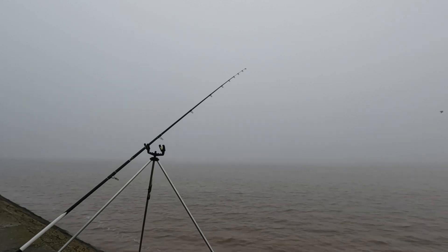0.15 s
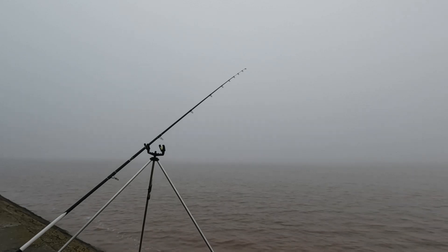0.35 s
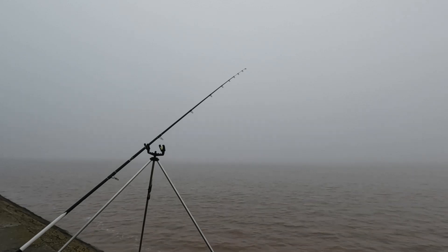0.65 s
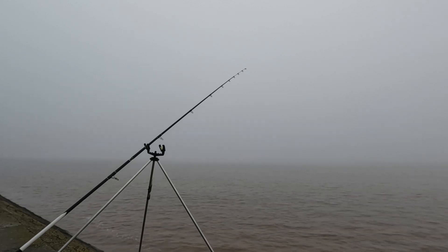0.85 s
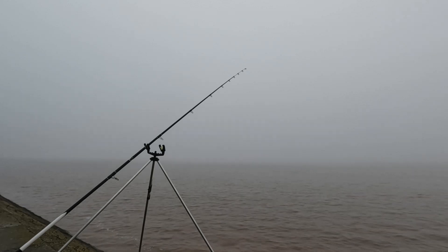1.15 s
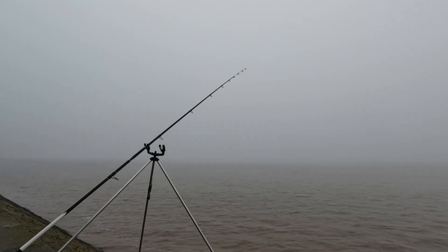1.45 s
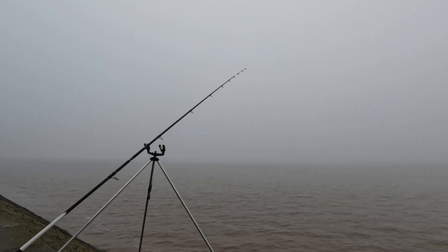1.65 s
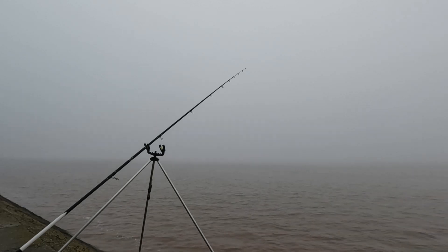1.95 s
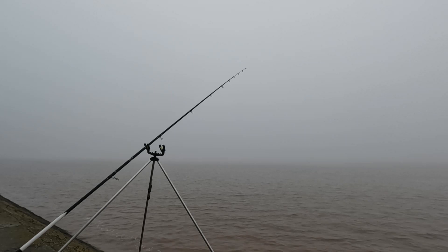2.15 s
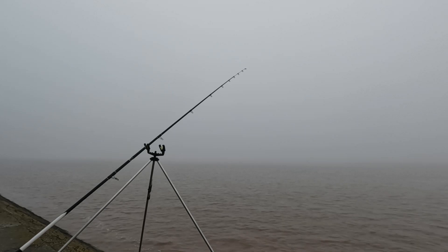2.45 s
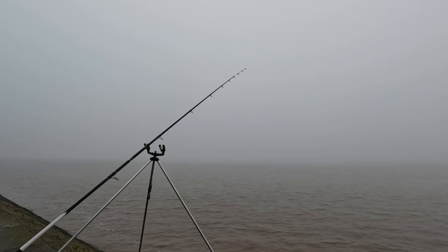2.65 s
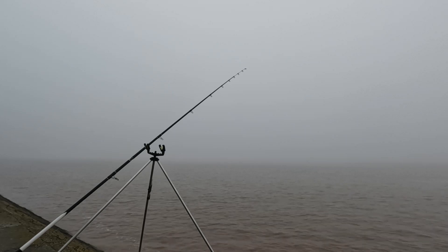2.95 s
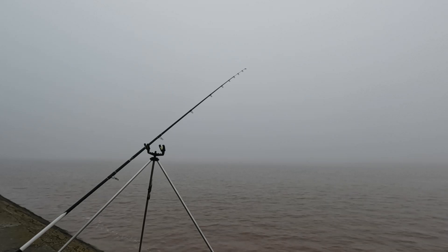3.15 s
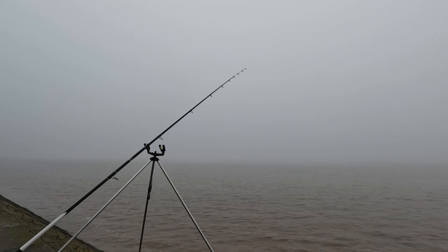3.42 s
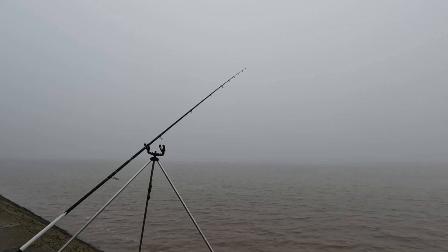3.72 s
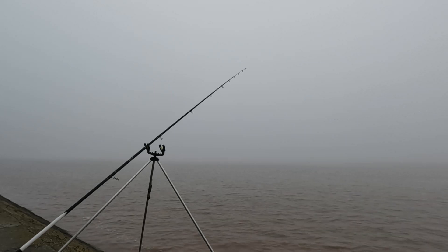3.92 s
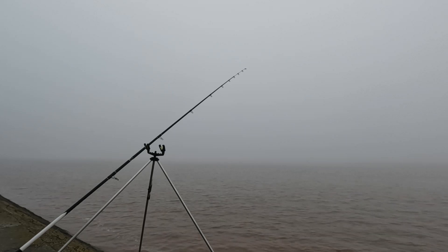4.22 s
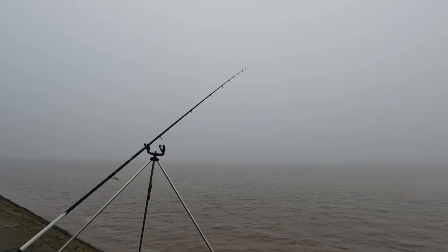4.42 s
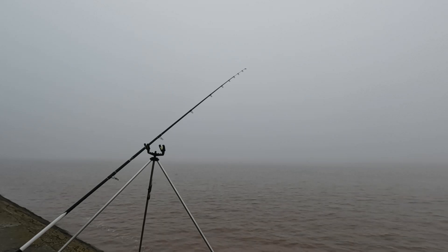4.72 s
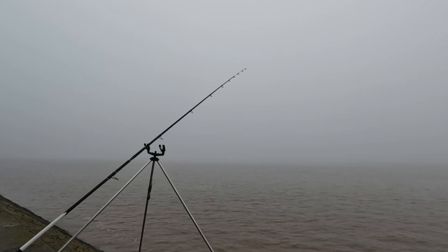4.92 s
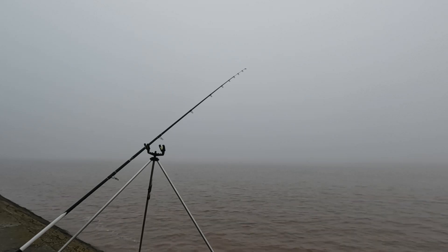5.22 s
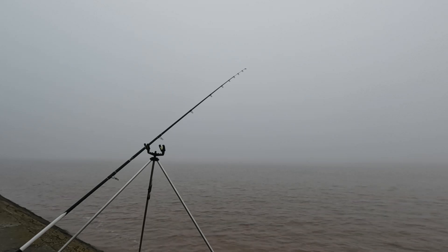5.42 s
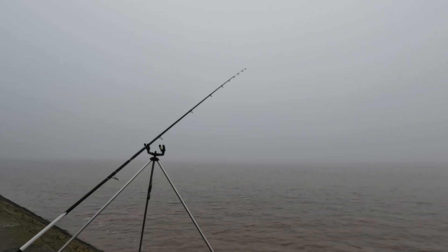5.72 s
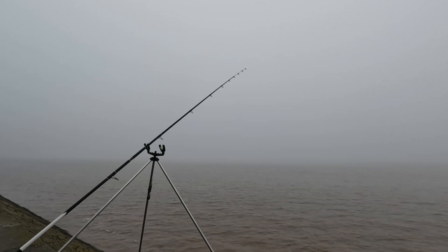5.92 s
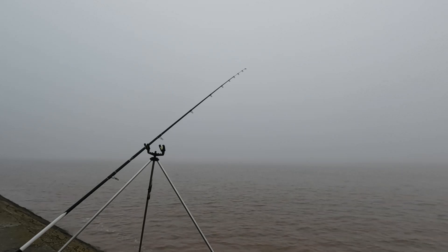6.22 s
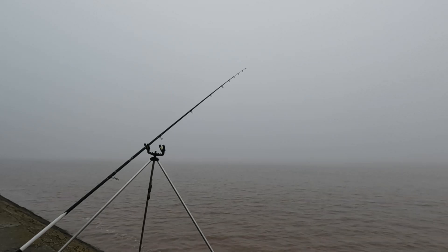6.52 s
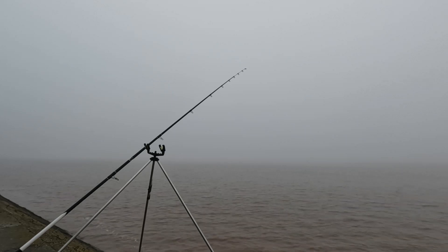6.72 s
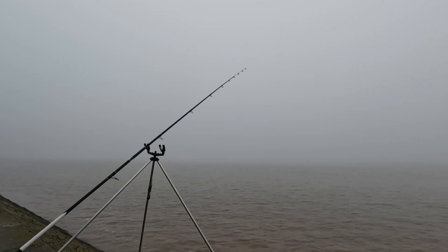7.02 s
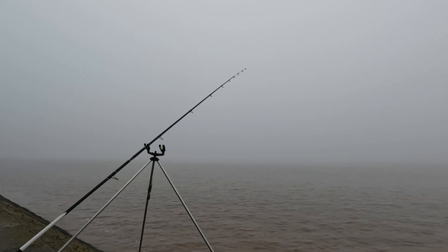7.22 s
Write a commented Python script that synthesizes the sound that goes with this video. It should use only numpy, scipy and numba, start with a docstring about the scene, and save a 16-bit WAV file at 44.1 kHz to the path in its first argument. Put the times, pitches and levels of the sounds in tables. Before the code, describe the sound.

A low wind rumbles steadily while river water washes gently on stone, with light slaps, ticking drops and little bubbling glugs.

```python
"""River lapping a stone bank

A wide muddy river laps a sloping stone bank on a foggy day, close below the listener.
Wind and far-off rumble fill the bass, and a faint narrow hum hangs over the water.
Wavelets wash up as a fizz of countless bubbles, and drops slap and tick on the stones.
Small bubbles pop as short tones; pockets of air glug, gliding in pitch as they surface."""
import sys
import numpy as np
from scipy import signal
from scipy.fft import rfft, irfft, next_fast_len
from scipy.io import wavfile
from scipy.ndimage import uniform_filter1d
from numba import njit

SR = 44100
rng = np.random.default_rng(int(sys.argv[2]) if len(sys.argv) > 2 else 0)


def unload_wav(signal):
    """Save mono or channel-first audio to the path in sys.argv[1] as 16-bit WAV at rate SR, clipped to [-1, 1]."""
    wavfile.write(
        sys.argv[1],
        SR,
        np.round(np.clip(np.atleast_2d(signal).T, -1, 1) * 32767).astype(np.int16),
    )


N = 324576
BIN_HZ = np.maximum(np.arange(N // 2 + 1) * SR / N, 1)


def undb(db):
    """Decibels to gain."""
    return 10 ** (np.asarray(db) / 20)


def unit(x):
    """Scale to rms 1."""
    return x / np.sqrt(np.mean(x ** 2))


def curves(table):
    """Automation lanes: each column ramps straight between its time points."""
    s, *columns = np.transpose(table)
    return [np.interp(np.arange(N) / SR, s, c) for c in columns]


def at(table, hz):
    """Value of a (Hz, value) table on a log-frequency axis."""
    f, v = np.transpose(table)
    return np.interp(np.log(hz), np.log(f), v)


def walk(rate_hz):
    """Random modulator: sample-and-hold, smoothed twice, with a spread near 1."""
    hold = int(SR / rate_hz)
    steps = np.repeat(rng.standard_normal(N // hold + 1), hold)
    return 1.3 * uniform_filter1d(uniform_filter1d(steps, hold), hold)[:N]


def noise(gain, alike):
    """Mid/side noise with a gain per frequency; alike runs from 0 (wide) to 1 (mono)."""
    mid, side = rfft(rng.standard_normal((2, N))) * gain
    alike = np.clip(alike, 0, 1)
    mid, side = mid * np.sqrt((1 + alike) / 2), side * np.sqrt((1 - alike) / 2)
    return irfft(np.array([mid + side, mid - side]), N)


def bands(spectrum, alike, centres_hz):
    """Coloured noise in overlapping bands that together have rms 1."""
    gain = unit(undb(at(spectrum, BIN_HZ)))
    shares = [np.interp(np.log(BIN_HZ), np.log(centres_hz), row) for row in np.eye(len(centres_hz))]
    return [noise(gain * np.sqrt(share), at(alike, BIN_HZ)) for share in shares]


# Wind swells: (time [s], deep bass level [dB], upper bass level [dB])
WIND_SWELLS = [(0, -28, -36.5), (0.7, -26.5, -36.5), (.9, -24.5, -40.5), (1.1, -22.5, -36),
               (1.29, -24.5, -31), (1.37, -28, -41), (2.2, -27, -38), (2.55, -24, -36), (2.75, -28.5, -39),
               (3.4, -27, -37.5), (3.8, -28, -38), (4.3, -26, -33.5), (5.0, -27, -38.5), (5.7, -28, -40.5),
               (6.4, -28, -38), (6.9, -26.5, -40), (7.36, -25.5, -37.5)]
# Rumble EQ: (frequency [Hz], relative level [dB])
RUMBLE_EQ = [(5, -28.5), (12, -2), (22, 1.5), (33, -1.5), (54, -2), (70, -9.5), (105, -10), (157, -11.5),
             (254, -25), (340, -34), (450, -65), (700, -120)]
# Rumble stereo image: (frequency [Hz], left-right correlation [0-1])
RUMBLE_IMAGE = [(20, 0.78), (60, 0.88), (100, 0.5), (130, 0.39), (200, 0.82), (300, 0.57)]
def wind():
    """Turbulent rumble whose deep and upper bass swell separately."""
    deep_db, upper_db = curves(WIND_SWELLS)
    deep, upper = bands(RUMBLE_EQ, RUMBLE_IMAGE, [70, 115])
    return undb(deep_db) * unit(deep) + undb(upper_db) * unit(upper)


# Hum resonances: (centre [Hz], width [Hz], level [dB])
HUM_BANDS = [(148.5, 15, -50), (444.2, 20, -61), (2044, 29, -69.5)]
def hum():
    """Faint narrow bands of noise that waver, perhaps a distant engine."""
    out = 0
    for hz, width, db in HUM_BANDS:
        resonance = 1 / (1 + (2 * (BIN_HZ - hz) / width) ** 2)
        out += undb(db + .67 * walk(2.2)) * unit(noise(resonance, alike=.97))
    return out


# Wavelets on the stones: (crest time [s], length [s], wash crest [dB], spray crest [dB])
WAVELET_CRESTS = [(0.17, .3, -45, -62), (0.3, .3, -51, -59), (0.51, .15, -42, -55), (0.662, .35, -45, -56),
                  (1.06, .5, -43, -51), (1.317, .2, -46.5, -59.5), (1.501, .4, -53, -58.5),
                  (1.811, .15, -50, -62.5), (1.959, .2, -48, -63), (2.079, .2, -54, -59.5),
                  (2.175, .15, -50, -60), (2.297, .14, -45, -55), (2.428, .2, -50, -58.5),
                  (2.584, .2, -48, -60), (2.749, .15, -48, -59.5), (2.896, .2, -47, -55),
                  (3.069, .25, -48, -58.5), (3.227, .2, -48, -63), (3.37, .25, -50, -58.5),
                  (3.585, .2, -49, -67.5), (3.764, .25, -55, -59.5), (3.933, .14, -46, -54),
                  (4.148, .4, -51, -59), (4.413, .3, -51, -58), (4.671, .13, -41, -54),
                  (4.827, .2, -49, -59.5), (4.921, .09, -50, -54.5), (5.139, .14, -50, -56.5),
                  (5.241, .12, -52, -60), (5.285, .1, -49, -63), (5.383, .12, -54, -59),
                  (5.498, .35, -54, -64), (5.917, .3, -51, -59.5), (6.039, .25, -48, -59.5),
                  (6.172, .15, -51, -64), (6.379, .2, -50, -60), (6.498, .35, -51, -64.5),
                  (6.829, .17, -54, -61), (7.023, .3, -49, -60.5), (7.258, .25, -53, -65.5)]
def wavelets(attack_share=.4, drop_db=10, calm_wash_db=-57, calm_spray_db=-70):
    """Wash and spray envelopes in dB: each wavelet runs up, crests and drains into the calm hiss."""
    crest_s, length, *crests_db = np.transpose(WAVELET_CRESTS)[:, :, None]
    t = np.arange(0, N, 64) / SR
    # 0 at the crest, 1 at either end of the wavelet
    away = np.maximum((crest_s - t) / attack_share, (t - crest_s) / (1 - attack_share)) / length
    envelopes = []
    for crest_db, calm_db in zip(crests_db, (calm_wash_db, calm_spray_db)):
        power = undb(2 * calm_db) + undb(2 * (crest_db - drop_db * away)).sum(axis=0)
        envelopes.append(np.interp(np.arange(N) / SR, t, 10 * np.log10(power)))
    return envelopes


# Water fizz EQ: (frequency [Hz], relative level [dB])
FIZZ_EQ = [(150, -56.5), (250, -10.5), (450, -6), (820, -9), (950, -5), (1420, -7), (3460, -14),
           (4250, -21), (7180, -25.5), (8400, -37.5), (10300, -36.5), (12000, -41.5), (13800, -59.5)]
# Fizz stereo image: (frequency [Hz], left-right correlation [0-1])
FIZZ_IMAGE = [(300, 0.47), (1000, 0.77), (2500, 0.48), (5000, 0.98), (8000, 1), (12000, 0.1)]
def wash(wash_db, spray_db, mist_db):
    """Countless far bubbles blur into a hiss whose bands flicker together and alone."""
    centres_hz = 300 * 2 ** np.arange(0, 5.6, .6)
    out, shared_flicker = 0, walk(30)
    mist_db = mist_db + 1.5 * walk(12)
    for hz, band in zip(centres_hz, bands(FIZZ_EQ, FIZZ_IMAGE, centres_hz)):
        spray = np.clip(np.log2(hz / 1500) / 1.86, 0, 1)  # the highs ride the spray envelope
        mist = np.clip(np.log2(hz / 5000), 0, 1)
        follow = np.clip(hz / 900, .3, 1)  # the low murmur comes from further off and swells less
        db = (1 - spray) * (follow * (wash_db + 52) - 52) + spray * (spray_db + 6) + mist * mist_db
        flicker_db = (1.37 - .5 * spray) * shared_flicker + 1.2 * walk(11)
        out += band * undb(db + flicker_db)
    return out


@njit
def ring(rows, swell, sharp, bend, vibrato, tremolo):
    """Each bubble is a sine that swells, fades and glides as its air nears the surface."""
    out = np.zeros((2, N))
    for s, left, right, hz, octaves, length in rows:
        start, count, phase = int(s * SR), int(length * SR), 0.
        for j in range(min(count, N - start)):
            i, age = start + j, j / count
            phase += 2 * np.pi * hz * vibrato[i] * 2 ** (octaves * age ** bend) / SR
            tone = np.sin(np.pi * age ** swell) ** sharp * np.sin(phase) * tremolo[i]
            out[0, i] += left * tone
            out[1, i] += right * tone
    return out


def bubbles(s, db, hz, octaves, length, pan_db, swell=.34, sharp=1.79, bend=1.43, churn=1):
    """Bubbles shaken by churning water; swell delays the peak, sharp narrows it, bend delays the glide."""
    rows = np.column_stack([s, undb(db + pan_db / 2), undb(db - pan_db / 2), hz, octaves, length])
    vibrato = 2 ** (churn * .04 * walk(260))
    tremolo = undb(churn * 2.5 * np.clip(walk(260), -2, 1))
    return ring(rows, swell, sharp, bend, vibrato, tremolo)


def crowd(when, envelope_db, follow):
    """Turn 0-1 draws into sample positions, denser where the envelope is high."""
    total = np.cumsum(undb(follow * envelope_db))
    return np.minimum(np.searchsorted(total / total[-1], when), N - 1)


def patter(wash_db, spray_db, count=6000):
    """A bed of small bubbles that thickens with each wavelet; a few stand out."""
    when, size, pitch, cycles, glide, pan = rng.random((count, 6)).T
    i = crowd(when, wash_db, follow=1.2)
    hz = 300 * 2 ** (5.2 * pitch)
    spray = np.clip(np.log2(hz / 1500) / 1.5, 0, 1)
    ride_db = (1 - spray) * .5 * (wash_db[i] + 46.5) + spray * .66 * (spray_db[i] + 61)
    colour_db = at(FIZZ_EQ, hz) + 10 * np.log10(hz / 1000)  # the fizz in a band as wide as the pitch
    accent_db = np.minimum(-3.2 * np.log(size), 5.5)
    db = ride_db + colour_db + accent_db - 42.5
    length = 3.07 * 6.3 ** cycles / hz
    return bubbles(i / SR, db, hz, 1.45 * glide - .25, length, pan_db=7 * pan - 3.5)


def spatter(wash_db, spray_db, count=300):
    """Cues for splash(): faint drops ticking on wet stone, each with its own colour."""
    when, size, low, high, fade = rng.random((count, 5)).T
    i = np.maximum(crowd(when, spray_db, follow=.5), 100)
    db = spray_db[i] + np.minimum(-3 * np.log(size), 9) - 6.5
    body_db = wash_db[i] - spray_db[i] - 16 * low + 8.5
    mist_db = 14 * high - 8.5
    return np.column_stack([i / SR, db, body_db, mist_db, .011 + .014 * fade])


# Water slapping stone: (time [s], spray level [dB], body relative to spray [dB])
SLAP_HITS = [(0.1366, -68, 4), (0.2423, -46, -3), (0.4903, -55, 10), (0.5056, -51.5, 13),
             (0.7913, -42.5, 6.5), (1.0111, -47, 2), (1.046, -52, 1), (1.0695, -49, 0), (1.1218, -43, -6),
             (1.3269, -43.5, 5), (1.3748, -47, -3), (1.5579, -60, -2), (1.7614, -52.5, 15),
             (1.8083, -51, 8), (1.8756, -53, -12), (1.959, -44, 8), (2.0775, -40, 7.5), (2.1246, -54, 7),
             (2.1375, -48, 10.5), (2.162, -46.5, 13), (2.2383, -44, 8), (2.2947, -43, 8.5), (2.445, -48, 6),
             (2.78, -46, 7), (2.8585, -45, 9.5), (2.8744, -47, -1), (2.916, -46, 8), (3.0664, -45, -8),
             (3.113, -56, 23), (3.3348, -41, -2), (3.3917, -46.5, -5), (3.667, -52, 11), (3.889, -43, 8),
             (3.9192, -49.5, 16), (4.0277, -48, -8), (4.0447, -42.5, 3), (4.118, -43, 8.5), (4.166, -51, 8),
             (4.1874, -48, 7), (4.2298, -44.5, 12), (4.3135, -44.5, 6.5), (4.4106, -46, 12),
             (4.6485, -45, 10), (4.674, -47, 13), (4.6977, -39, 9), (4.7436, -48, 3), (4.788, -45.5, -6),
             (4.824, -51, -19), (4.8628, -55, -16), (4.91, -58, -6), (4.9268, -35.5, -2), (5.02, -51, 7),
             (5.106, -52, 1), (5.131, -47.5, 3), (5.15, -47, 13), (5.161, -56, -8), (5.2325, -46, -13),
             (5.251, -53, -6), (5.278, -46.5, 8), (5.3684, -47, -13), (5.387, -59, -3), (5.402, -66, -3),
             (5.51, -52, -2), (5.8574, -48, 11), (5.902, -49, 10.5), (5.9425, -39.5, -2), (5.9693, -48, -8),
             (5.988, -43, 2), (6.0282, -49, 5), (6.1484, -51, -11), (6.227, -49, 6), (6.3594, -52, 8),
             (6.377, -42, 4), (6.446, -50, -3), (6.6768, -52.5, 1), (6.864, -49, -4), (6.9124, -54, 4),
             (6.993, -42.5, 1), (7.0854, -50, -10), (7.2434, -49, 9), (7.3148, -45.5, 4)]
def slaps(fade_s=.022):
    """Cues for splash(): the foreground slaps, where the heavier ones throw less mist."""
    s, db, body_db = np.transpose(SLAP_HITS)
    mist_db = -9 - .39 * body_db - rng.standard_normal(len(s))
    return np.column_stack([s, db, body_db, mist_db, np.full(len(s), fade_s)])


def splash(cues, bank_mist_db):
    """Water hits stone as a burst of fizz in three bands: body, spray (the first to die) and mist."""
    body, spray, mist = bands(FIZZ_EQ, FIZZ_IMAGE, [3600, 5000, 7000])
    body = irfft(rfft(body) / (1 + (900 / BIN_HZ) ** 4), N)  # low cut: too small to boom
    power = np.zeros((3, 2, N))  # (band, channel, sample)
    for (s, db, body_db, mist_db, fade_s), pan in zip(cues, rng.standard_normal((len(cues), 3))):
        i = int((s - .002) * SR)
        t = np.arange(min(int(2 * fade_s * SR), N - i)) / SR
        attack = np.minimum(t / .0022, 1)
        layers = [(body_db, .7, 2.5), (0, 1, 2.5), (mist_db + bank_mist_db[int(s * SR)], .8, 7)]
        for k, (layer_db, pace, scatter_db) in enumerate(layers):
            balance = undb(scatter_db * pan[k] * np.array([[1], [-1]]))
            envelope = attack * undb(db + layer_db - 60 * pace * t / fade_s)
            power[k, :, i:i + len(t)] += balance * envelope ** 2
    return sum(unit(band) * np.sqrt(p) for band, p in zip((body, spray, mist), power))


# Foreground bubbles: (time [s], level [dB], pitch [Hz], length [s])
BUBBLE_POPS = [(0.144, -27.5, 1078, 0.0083), (0.155, -40.5, 932, 0.033), (0.193, -40, 1764, 0.0078),
               (0.283, -32.5, 1280, 0.021), (0.469, -41, 1160, 0.0099), (0.541, -30, 1900, .003),
               (0.627, -36, 940, 0.0085), (0.684, -35.5, 1200, 0.01), (0.832, -28, 1296, 0.0016),
               (0.93, -36, 1300, 0.007), (0.968, -26.5, 1220, 0.0026), (1.0118, -29, 2230, 0.0018),
               (1.019, -41, 900, .008), (1.049, -40, 2900, .006), (1.05, -40, 1184, .025),
               (1.073, -41, 2950, 0.0064), (1.08, -36, 2920, 0.011), (1.148, -34, 990, 0.015),
               (1.171, -36.5, 1570, 0.0065), (1.25, -40, 940, 0.022), (1.269, -37, 980, 0.012),
               (1.3, -35, 2220, 0.0041), (1.325, -48, 1090, 0.013), (1.333, -36.5, 2430, 0.0088),
               (1.342, -28.5, 1610, 0.0032), (1.763, -39, 1060, 0.0077), (2.063, -37, 980, 0.0037),
               (2.162, -39, 1210, 0.013), (2.21, -39, 1950, .005), (2.228, -34, 1020, 0.0041),
               (2.269, -37, 1910, .006), (2.286, -39, 1000, 0.019), (2.29, -36, 1570, 0.0068),
               (2.306, -40, 3170, 0.009), (2.311, -36, 1350, 0.0067), (2.342, -40, 1390, 0.011),
               (2.369, -41, 1950, 0.009), (2.599, -30.5, 1810, 0.0071), (2.618, -42, 1380, 0.011),
               (2.774, -35, 1840, 0.0079), (2.884, -33, 1080, 0.0097), (2.957, -28.5, 1320, 0.005),
               (3.014, -33.5, 1300, 0.01), (3.068, -40, 1120, 0.0084), (3.104, -44, 1170, 0.0075),
               (3.195, -40, 1120, 0.0052), (3.273, -47, 1690, .015), (3.479, -38.5, 1470, 0.013),
               (3.541, -35, 1480, 0.0045), (3.626, -42.5, 1420, 0.012), (3.773, -39, 1170, 0.0087),
               (3.867, -42, 990, 0.019), (3.922, -28.5, 2370, 0.0041), (3.93, -20.5, 1085, 0.0071),
               (3.935, -27, 1950, 0.0026), (4.017, -42, 1020, 0.016), (4.117, -37, 1426, 0.017),
               (4.146, -37, 1410, 0.013), (4.163, -35, 2500, 0.0048), (4.218, -43, 1920, 0.0054),
               (4.307, -41, 1150, 0.0089), (4.308, -38, 1800, 0.0073), (4.322, -37, 1140, 0.013),
               (4.402, -36, 1040, 0.0067), (4.443, -37.5, 2070, 0.0084), (4.52, -34, 1400, 0.0038),
               (4.592, -31, 1910, 0.0038), (4.649, -25.5, 1560, 0.0075), (4.664, -28, 1620, 0.0036),
               (4.672, -33, 1960, 0.0092), (4.692, -37, 1340, .003), (4.821, -40, 1470, 0.0033),
               (4.708, -41, 790, 0.012), (4.851, -35, 1370, 0.012), (4.931, -28, 2500, 0.0017),
               (5.089, -36, 1960, 0.0035), (5.095, -43.5, 1200, 0.036), (5.152, -45, 1310, .003),
               (5.222, -46, 2720, 0.0046), (5.284, -28, 1190, 0.0044), (5.511, -39.5, 3250, 0.0059),
               (5.858, -43, 2210, .009), (5.903, -32.5, 835, 0.0059), (5.937, -37, 1480, 0.025),
               (5.947, -31.5, 890, 0.0039), (6.0172, -29.5, 1930, 0.0022), (6.047, -40, 2500, .007),
               (6.112, -41, 1770, 0.0085), (6.362, -45, 2510, 0.011), (6.374, -35, 1050, .007),
               (6.4, -37, 2410, 0.0046), (6.466, -44, 1490, 0.025), (6.482, -43, 1180, 0.024),
               (6.981, -42, 1016, 0.014), (6.992, -41, 2040, 0.007), (7.024, -38, 2200, 0.0073),
               (7.028, -35.5, 3000, 0.0036), (7.04, -38.5, 1670, 0.013), (7.104, -41, 2500, 0.0058),
               (7.325, -33.5, 1403, 0.0031)]
def pops(glide_octaves=-.021, spread_db=4):
    """Small bubbles pop along the water's edge, each a short ping of nearly steady pitch."""
    s, db, hz, length = np.transpose(BUBBLE_POPS)
    pan_db = spread_db * rng.standard_normal(len(s))
    return bubbles(s, db, hz, np.full(len(s), glide_octaves), length, pan_db, churn=.64)


# Trapped air: (time [s], level [dB], start pitch [Hz], glide [octaves], length [s])
AIR_POCKETS = [(0.246, -38, 298, 1.3, 0.04), (0.506, -37, 480, 0.3, 0.013), (0.536, -34, 267, -0.5, 0.025),
               (0.568, -43, 299, 2.3, 0.047), (0.732, -36, 615, 1.5, 0.014), (0.864, -36, 292, 1.3, 0.073),
               (0.97, -41, 368, 0.7, .03), (1.022, -39, 570, -0.3, 0.018), (1.044, -46, 473, -3.7, 0.035),
               (1.078, -28.5, 124, 0.2, 0.065), (1.085, -41.5, 320, -2.2, 0.045),
               (1.155, -41, 432, -0.2, 0.039), (1.16, -35, 204, -1, 0.019), (1.235, -36, 201, -0.5, 0.041),
               (1.262, -27, 148, 0.4, 0.078), (2.173, -33.5, 456, 0.5, 0.022), (2.109, -51, 1260, 2, 0.02),
               (2.388, -41, 620, 1.5, 0.0323), (2.492, -39, 605, 0.3, 0.036), (2.582, -44, 357, 0.1, 0.1),
               (2.855, -41, 690, -1.2, 0.021), (2.877, -41, 615, 0.3, 0.043),
               (2.89, -40.5, 446, 0.1, 0.056), (2.958, -48, 487, 1.8, 0.049), (3.052, -36, 232, 0.3, 0.051),
               (3.075, -41, 286, 2.5, 0.046), (3.12, -45, 423, 1, .05), (3.312, -52, 490, 0.5, .025),
               (3.515, -42, 434, -0.2, 0.03), (3.539, -33, 297, 3.8, 0.017), (3.563, -39, 530, 0.5, .02),
               (3.89, -37.5, 287.5, 2.5, 0.045), (4.122, -40, 260, 1.2, 0.04),
               (4.205, -30.5, 184, 0.7, 0.048), (4.258, -32.5, 203, 1.1, 0.024),
               (4.3, -36.5, 493, 1.2, 0.013), (4.448, -41.5, 540, 0.8, 0.029),
               (4.525, -39.5, 440, -0.2, 0.049), (4.56, -32, 157, -0.6, 0.063),
               (4.699, -36, 300, -1.1, 0.018), (5.05, -28.5, 141, 0.5, 0.11),
               (6.038, -35.5, 386, 1.1, 0.0163), (6.222, -42, 514, .2, 0.029),
               (6.687, -46.5, 557, 1, 0.033), (6.865, -39, 626, -0.9, 0.028), (7.03, -61, 1030, -1, 0.052),
               (7.103, -46, 706, 0.5, 0.034)]
def glugs(spread_db=4):
    """Air pockets ring between the stones: lower, rounder tones, most of them sliding up."""
    pan_db = spread_db * rng.standard_normal(len(AIR_POCKETS))
    return bubbles(*np.transpose(AIR_POCKETS), pan_db, swell=.33, sharp=.83, bend=1.22)


# Where the water breaks along the bank: (time [s], left minus right [dB], mist trim [dB])
BANK_MOVES = [(0, -1, -3), (.5, -2.5, -4), (1.05, -1.5, -2.5), (1.5, -1, -6), (1.85, 1, 1),
              (2.3, -1.5, 2.5), (2.85, -3, -0.5), (3.4, -2, -1.5), (4.03, -0.5, 1), (4.6, -2.5, 3.5),
              (5.2, 0.5, 0.5), (5.9, -1, -0.5), (6.4, -0.5, -1.5), (7.0, 1, 0), (7.36, -0.5, 3)]
def scene():
    """The mix: the water drifts left and right along the bank, over wind and hum."""
    wash_db, spray_db = wavelets()
    pan_db, mist_db = curves(BANK_MOVES)
    drops = spatter(wash_db, spray_db)
    water = splash(np.vstack([slaps(), drops]), mist_db)
    water += wash(wash_db, spray_db, mist_db) + patter(wash_db, spray_db) + glugs() + pops()
    return wind() + hum() + water * undb(np.array([pan_db, -pan_db]) / 2)


# Colour difference of the two microphone ports: (frequency [Hz], left minus right [dB])
PORT_BALANCE = [(30, -0.3), (60, 1.5), (125, 0.2), (250, 0.5), (1000, 0.5), (4000, 0), (8000, 2),
                (12000, 5)]
def record(dry):
    """A phone's two ports differ in colour, the left hears a moment later, and the top is cut."""
    left_lag_s, top_hz = 2e-5, 14000
    pad = next_fast_len(N + 8192) - N  # handles at both ends let the filters settle
    lead = pad // 2
    padded = np.pad(dry, ((0, 0), (lead, pad - lead)), mode="reflect", reflect_type="odd")
    hz = np.maximum(np.arange((N + pad) // 2 + 1) * SR / (N + pad), 1)
    left = undb(at(PORT_BALANCE, hz) / 2) * np.exp(-1j * np.pi * hz * left_lag_s)
    heard = irfft(rfft(padded) * np.array([left, 1 / left]), N + pad)
    high_cut = signal.ellip(8, .2, 70, top_hz, fs=SR, output="sos")
    return signal.sosfilt(high_cut, heard)[:, lead:lead + N]


dry = scene()
out = record(dry)
unload_wav(out)
```